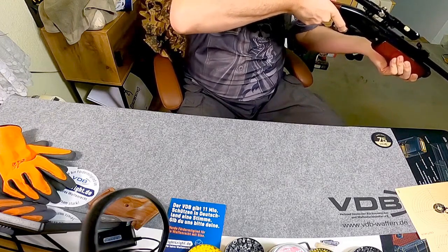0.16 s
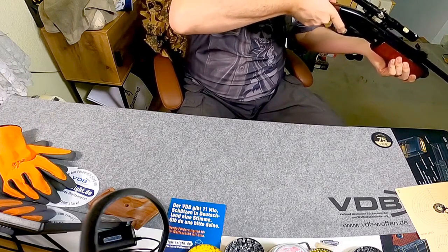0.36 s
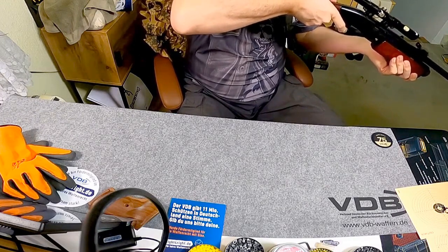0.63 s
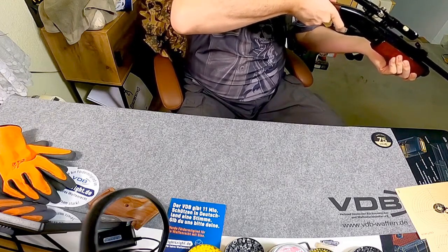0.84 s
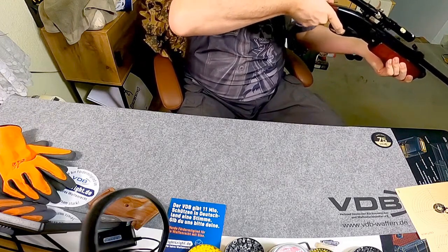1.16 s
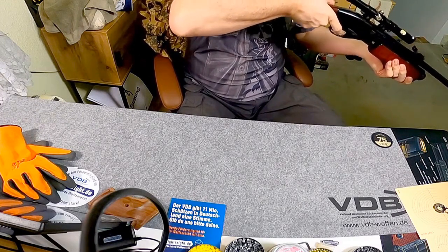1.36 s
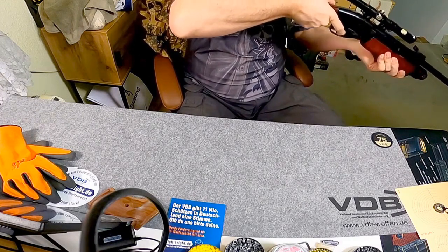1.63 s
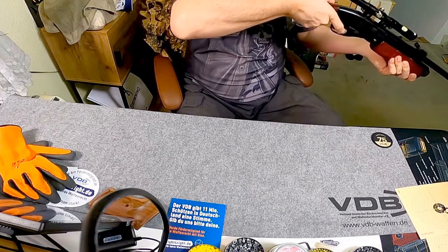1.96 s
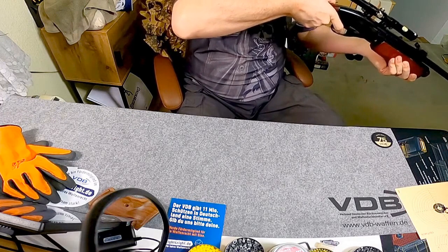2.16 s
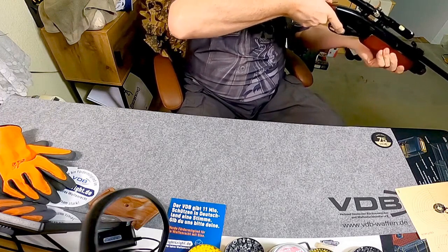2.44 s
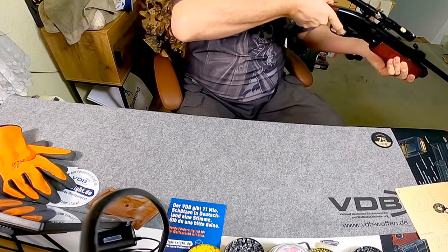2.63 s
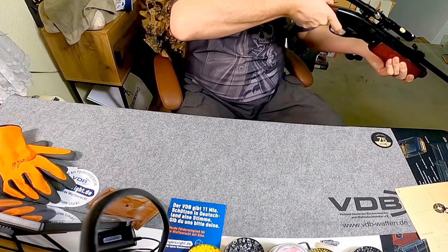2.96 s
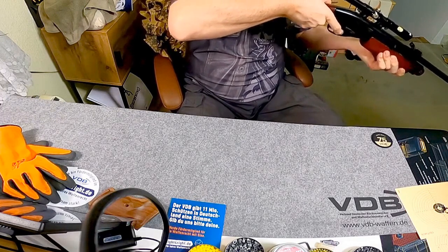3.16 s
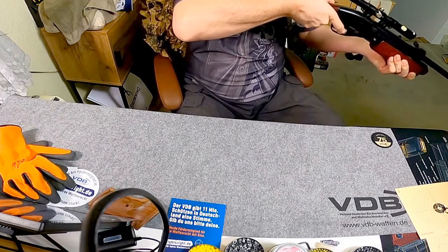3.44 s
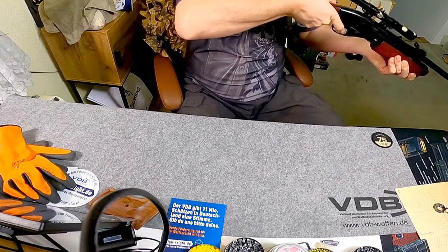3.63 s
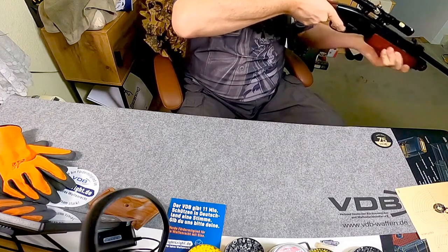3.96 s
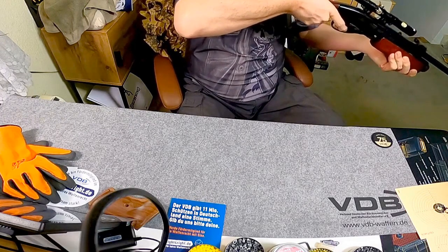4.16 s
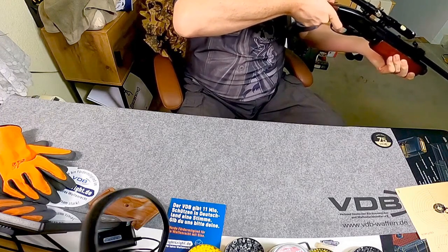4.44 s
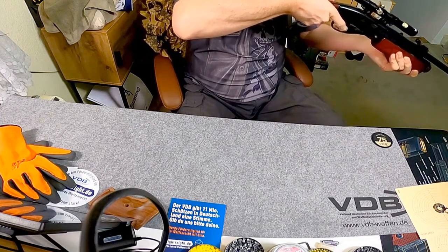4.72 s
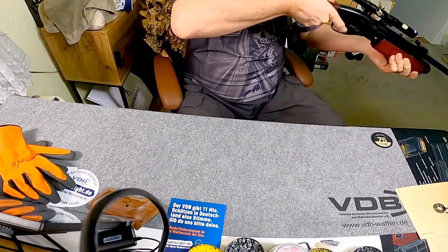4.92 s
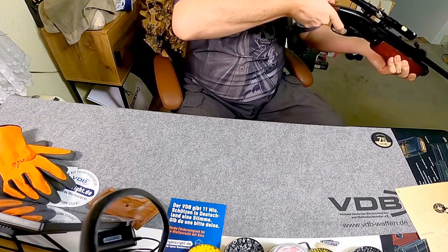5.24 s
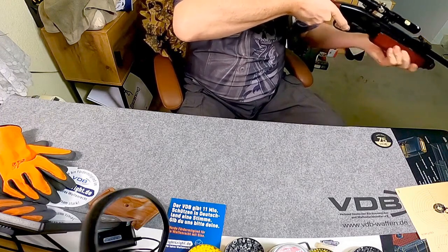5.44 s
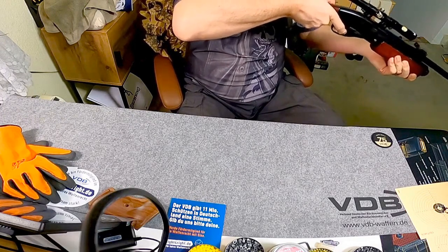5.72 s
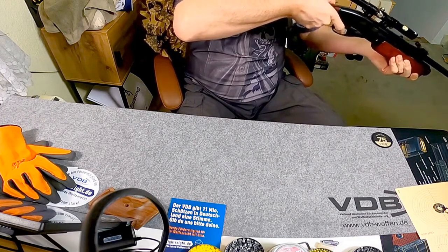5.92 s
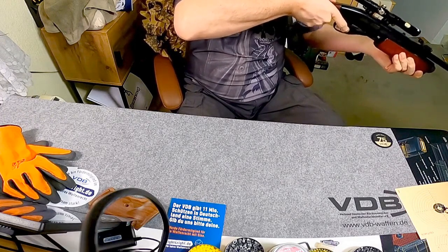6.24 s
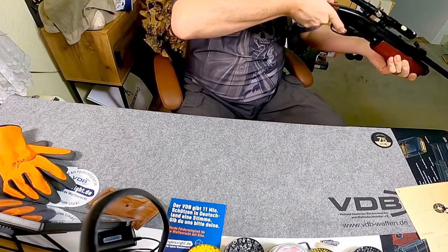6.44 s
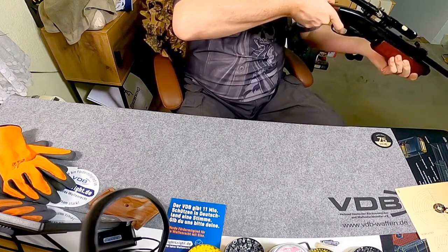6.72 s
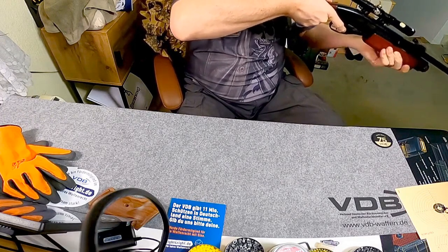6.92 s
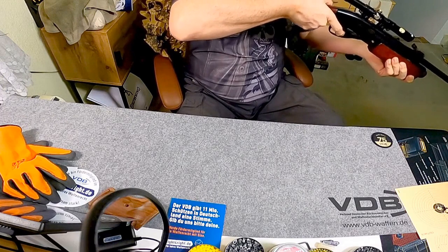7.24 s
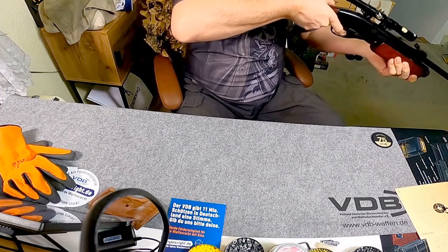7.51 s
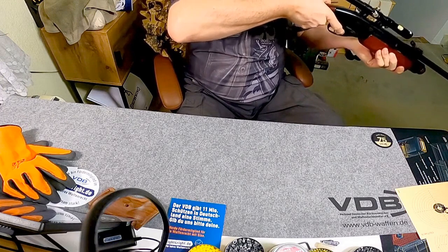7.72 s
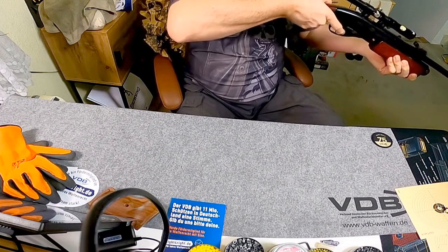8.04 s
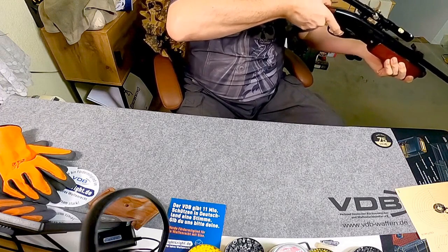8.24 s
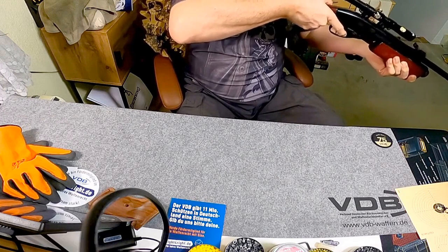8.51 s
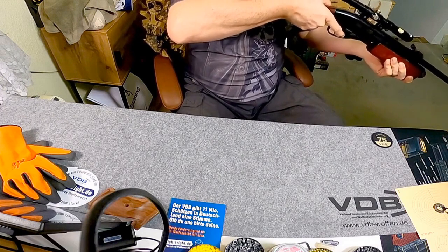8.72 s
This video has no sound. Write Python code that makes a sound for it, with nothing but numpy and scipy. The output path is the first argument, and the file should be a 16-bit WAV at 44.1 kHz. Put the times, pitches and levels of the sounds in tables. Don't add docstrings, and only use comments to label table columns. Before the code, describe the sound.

Close, sharp steel clacks repeat about every 0.7 seconds as a rifle's fore-end is pumped, each backward slam leaving a brief rattling spring jangle.

```python
import sys
import numpy as np
from scipy import signal
from scipy.fft import rfft, irfft, next_fast_len
from scipy.io import wavfile
from scipy.ndimage import uniform_filter1d, map_coordinates

SR = 44100
rng = np.random.default_rng(int(sys.argv[2]) if len(sys.argv) > 2 else 0)


def generate_wav(signal):
    frames = np.transpose(np.atleast_2d(signal))
    scaled = np.clip(frames, -1, 1) * 32767
    pcm = np.round(scaled).astype(np.int16)
    wavfile.write(sys.argv[1], SR, pcm)


def gain_from_db(level_db):
    decades = np.asarray(level_db, float) / 20
    return 10 ** decades


N = 391166

# t/s, crack level/dB, crack f/Hz, stroke scrape level/dB, stock level/dB
MEETS = [(.0007, -18, 4470, -24.5, -40), (1.1295, -19.5, 3990, -23.5, -50), (1.7176, -23.5, 3350, -24, -34),
         (2.4773, -19, 3160, -22.5, -33), (3.1985, -18.5, 3620, -25.5, -34), (3.99, -18, 2960, -22.5, -44),
         (4.7251, -22, 3600, -23, -45), (5.4268, -24, 4780, -22, -34), (6.1403, -23.5, 3000, -22, -29),
         (6.958, -20, 3150, -22.5, -29), (7.8053, -17, 3240, -21.5, -45)]


def meets():
    return [(s, db - 1.5, db, hz, stock_db, db - 16) for s, db, hz, _, stock_db in MEETS]


# t/s, crack level/dB, crack f/Hz, pawl ring level/dB
KNOCKS = [(.0178, -12.5, 3300, -21), (1.1464, -19, 4250, -17), (1.7392, -15, 3780, -20.5),
          (2.4927, -16, 4030, -12.5), (3.215, -15, 3785, -15), (4.0062, -18, 3040, -23.5),
          (4.7419, -15, 3240, -15.5), (5.4471, -15, 2780, -22.5), (6.1584, -18, 2970, -18),
          (6.9758, -16.5, 2590, -15.5), (7.8233, -13.5, 3004, -18)]
# t/s, crack level/dB, crack f/Hz, pawl ring level/dB
STRAYS = [
    (1.1517, -21.5, 3300, -21.5),
    (1.7263, -24.5, 3814, -23),
    (4.5395, -26.5, 3800, -21),
    (5.9755, -16.5, 3770, -20),
    (6.8101, -20.5, 3970, -11.5),
]


def knocks():
    return [(s, ring_db, db, hz, db - 8.5, db - 16) for s, db, hz, ring_db in KNOCKS + STRAYS]


def rebounds():
    return [(s + .034, db - 26, db - 22, 2700, db - 16, db - 34) for s, db, *_ in KNOCKS]


# t/s, crack level/dB, crack f/Hz, pawl ring level/dB
DROPS = [(.143, -29, 2680, -20.5), (1.2739, -26, 3190, -15.5), (1.853, -24.5, 3490, -15.5),
         (2.6076, -29, 3270, -24), (3.317, -27.5, 4720, -20), (4.1066, -31, 2530, -20.5),
         (4.8442, -28, 4200, -18), (5.5474, -39.5, 3670, -15.5), (6.26, -28, 2830, -16),
         (7.0772, -31.5, 2700, -23.5), (7.931, -32.5, 2700, -21)]


def drops():
    return [(s, ring_db, db, hz, db - 14, db - 18) for s, db, hz, ring_db in DROPS]


# t/s, pawl ring level/dB
TEETH = [(.159, -23), (.1638, -22), (1.288, -28), (1.3013, -37), (1.8668, -25), (2.614, -15), (2.629, -23),
         (3.3247, -16), (3.3396, -26), (4.1132, -21.5), (4.1233, -18), (4.137, -24.5), (4.8502, -19),
         (4.8565, -30), (5.5593, -20.5), (6.278, -26), (7.0872, -34), (7.094, -25), (7.9355, -18.5),
         (7.9477, -31), (7.952, -25), (7.9559, -33)]


def teeth():
    return [(s, db, db - 18, 3300, db - 17.2, db - 24) for s, db in TEETH]


# t/s, crack level/dB, crack f/Hz, fizz level/dB
LOCKS = [(.1918, -16, 4020, -24.5), (1.323, -17.5, 4330, -25.5), (1.8999, -17.5, 3790, -32.5),
         (2.6591, -18, 4500, -32), (3.3623, -22, 5110, -30), (4.1532, -23.5, 4420, -29),
         (4.8898, -20.5, 4330, -25), (5.5926, -19.5, 3660, -27), (6.3024, -18.5, 3630, -23.5),
         (7.1268, -20, 4665, -24.5), (7.978, -18.5, 4280, -25)]


def locks():
    return [(s, db - 1.5, db, hz, db - .8, fizz_db) for s, db, hz, fizz_db in LOCKS]


# t/s, crack level/dB, crack f/Hz, stroke scrape level/dB, fizz level/dB
SLAMS = [(.9147, -14.5, 4380, -20.5, -34), (1.5124, -14, 4340, -21.5, -29),
         (2.242, -15.5, 4640, -20.5, -38), (2.9709, -14, 4500, -19, -27), (3.7893, -16.5, 4280, -20.5, -35),
         (4.5454, -13, 4810, -19, -25), (5.2729, -12.5, 5000, -20.5, -21), (5.9607, -14, 4750, -23, -33.5),
         (6.7777, -12, 4980, -20, -28.5), (7.5911, -15.5, 4230, -18.5, -24),
         (8.4418, -14.5, 4830, -20.5, -30)]


def slams():
    return [(s, db - 15, db, hz, db - 14, fizz_db) for s, db, hz, _, fizz_db in SLAMS]


# t/s, blow level/dB, rattle level/dB, t60/s
RELEASES = [(.9369, -20, -22, .36), (1.5348, -25, -20.5, .3), (2.264, -23, -16, .3), (2.996, -23, -21, .34),
            (3.8132, -23, -21.5, .4), (4.5675, -31, -22, .44), (5.2942, -19, -19, .36),
            (5.9838, -19, -18.5, .34), (6.7958, -20, -21, .34), (7.6145, -25, -21, .35),
            (8.44, -60, -26, .42)]


def releases():
    return [(s, db - 7, db - 3, 4600, db - 6, db) for s, db, *_ in RELEASES]


def thud():
    pawl_db, crack_db, stock_db, fizz_db = -40, -40, -20, -50
    return [(8.454, pawl_db, crack_db, 2000, stock_db, fizz_db)]


# f/Hz, level/dB, t60/s
PAWL = [(1788, 5, 0.012), (1575, -5, 0.013), (2117, -5.5, 0.012), (2920, -9, 0.012), (6480, -23.5, 0.048)]


def pawl(db, t):
    return gain_from_db(db + 10.5) * ring(PAWL, t, detune=0.029) * (1 - np.exp(-t / 0.0011)) ** 2


# t/s, level/dB
TICKS = [(.8975, -26), (1.244, -34.5), (1.264, -26), (1.846, -24), (2.2184, -40), (2.9327, -34.5),
         (4.523, -29), (4.837, -20.5), (5.2474, -26.5), (5.542, -23), (5.9395, -29.5), (6.2545, -24),
         (6.75, -32), (7.567, -26), (8.418, -30)]


def ticks():
    out, t = np.zeros(N + SR), np.arange(SR // 8) / SR
    for s, db in TICKS:
        out[round(s * SR):][:len(t)] += pawl(db, t)
    return out[:N]


# ratio of f, level/dB
CLANK = [(1, 0), (.9, -3), (1.12, -3), (.72, -6), (1.35, -7)]


def clank(db, crack_hz, t):
    modes = [(ratio * crack_hz, mode_db, .016) for ratio, mode_db in CLANK]
    return gain_from_db(db + 7) * ring(modes, t, detune=.04) * (1 - np.exp(-t / 0.001))


# f/Hz, level/dB, t60/s
STOCK = [(671, 3.5, 0.034), (305.6, -8, 0.057), (1050, 3.5, 0.031), (165.8, -7, 0.05)]


def stock(db, t):
    return gain_from_db(db - 1) * ring(STOCK, t, detune=0.065) * (1 - np.exp(-t / 0.0014))


# f/Hz, width/Hz, level/dB
RECEIVER = [(2580, 90, 0), (2700, 150, 0.5), (2850, 200, -2), (3730, 130, -9.5), (1750, 150, -7),
            (650, 190, -5)]


def receiver(shaken):
    buzz = lines(RECEIVER, rng.standard_normal(N))
    return buzz * signal.fftconvolve(shaken, dying(0.2, rise=0.0017))[:N]


# f/Hz, level/dB
CRACK = [(1500, -36), (2400, 0.5), (4500, -2), (6500, -1.5), (8500, -28.5)]
# f/Hz, level/dB
FIZZ = [(5500, -29.5), (7200, 1), (11000, -2.5), (14000, -7.5), (15200, -17), (15800, -39.5)]


def contacts():
    out, shaken, t = np.zeros(N + SR), np.zeros(N + SR), np.arange(SR // 8) / SR
    crack, fizz = (np.pad(noise(colour), (0, SR)) for colour in (CRACK, FIZZ))
    snap = gain_from_db(-60 * t / 0.026) * (1 - np.exp(-t / .0009))
    lead = SR // 80
    since = t - lead / SR
    puff = gain_from_db(np.minimum(-60 * since / 0.056, 2300 * since + 1.2))
    blows = (meets() + knocks() + rebounds() + drops() + teeth() + locks()
             + slams() + releases() + thud())
    for s, pawl_db, crack_db, crack_hz, stock_db, fizz_db in blows:
        start = round(s * SR)
        at = slice(start, start + len(t))
        out[at] += gain_from_db(crack_db + 2) * snap * crack[at]
        out[at] += clank(crack_db, crack_hz, t)
        out[at] += pawl(pawl_db, t)
        out[at] += stock(stock_db, t)
        early_start = max(start - lead, 0)
        early = slice(early_start, early_start + len(t))
        out[early] += gain_from_db(fizz_db - 2.5) * puff * fizz[early]
        shaken[start] = gain_from_db(0.37 * pawl_db + 0.74 * crack_db - 17.5)
    return out[:N] + receiver(shaken)


def slides():
    def span(first, last, db, delay, bright_db, run_up, stop):
        return first + delay, db, bright_db, run_up, last - first + stop - delay

    back = [span(a[0], b[0], a[3], -.002, -6, .029, .02) for a, b in zip(SLAMS, RELEASES)]
    forward = [span(a[0], b[0], a[3], .004, -11, .025, .012) for a, b in zip(MEETS, KNOCKS)]
    creep = [span(a[0], b[0], -31, .001, -13, .026, .02) for a, b in zip(DROPS, LOCKS)]
    return back + forward + creep


# f/Hz, level/dB per Hz
SCRAPE = [(15, -59.5), (25, -31.5), (349, -2), (543, -0.5), (730, 0.5), (1030, -5), (1860, -1.5),
          (4410, -5.5), (4980, -10.5), (5500, -8), (5920, -6.5), (9000, -25), (11700, -47.5), (19800, -120)]


def strokes():
    dull, bright = np.zeros(N), np.zeros(N)
    for s, db, bright_db, run_up, hold in slides():
        near = slice(max(round(s * SR) - SR // 5, 0), min(round(s * SR) + SR // 3, N))
        t = np.arange(near.start, near.stop) / SR
        early = np.clip(s - t, 0, None) / run_up
        late = np.clip(t - s - hold, 0, None)
        shape_db = -24 * early - 20 * np.clip(early - 1, 0, None) - 60 * late / 0.13
        dull[near] += gain_from_db(db - 2.5 + shape_db)
        bright[near] += gain_from_db(db + bright_db - 3.5 + 0.93 * shape_db)
    drag = gain_from_db(-7.5) * lines([(1780, 330, 0)], noise(SCRAPE, grit_db=5))
    fizz = patchy(noise(FIZZ, grit_db=2), depth_db=4.5, size=(2, 6))
    return dull * (noise(SCRAPE, grit_db=2) + drag) + bright * fizz


# main f/Hz, level/dB, second f/Hz, level/dB
JANGLES = [
    (4993, -16, 5930, -19.5),
    (5020, -19, 6500, -22.5),
    (5050, -19.5, 8930, -22),
    (5030, -19, 5890, -20),
    (5040, -14.5, 5900, -28),
    (5080, -16.5, 8600, -25),
    (5050, -19.5, 5800, -23.5),
    (4879, -22.5, 5874, -22),
    (4920, -17.5, 8570, -23),
    (5010, -15.5, 8420, -19.5),
]
# f/Hz, level/dB
COIL = [(3510, -35), (4890, -28), (5900, -30), (6450, -27), (7250, -28), (8420, -29), (9950, -35),
        (12100, -40)]
# f/Hz, width/Hz, level/dB
BARREL = [(1900, 82, 0), (3080, 17, -1), (3510, 26, 0.5), (6060, 40, -2), (6470, 73, -1), (7000, 45, -3.5)]


def spring():
    barrel = lines(BARREL, noise([(100, 0), (15000, 0)], grit_db=5.5))
    rattle = patchy(noise(SCRAPE, grit_db=2.5), depth_db=3.5, size=(1, 6))
    rattle += gain_from_db(-8.5) * patchy(noise(FIZZ, grit_db=2.5), depth_db=4.5, size=(2, 8))
    out, hum, chatter = np.zeros((3, N + SR))
    t = np.arange(SR // 4) / SR
    for s, _, rattle_db, t60 in RELEASES:
        chatter[round(s * SR):][:SR // 2] += gain_from_db(rattle_db) * dying(0.86 * t60, rise=0.0043)
    for (s, *_), (main_hz, main_db, second_hz, second_db) in zip(RELEASES, JANGLES):
        start = round(s * SR)
        hum[start:][:SR // 2] += gain_from_db(-31) * dying(.35, rise=.004)
        seated = [(hz * (1 + .008 * rng.normal()), db + 3 * rng.normal()) for hz, db in COIL]
        for hz, db in [(main_hz, main_db), (second_hz, second_db)] + seated:
            t60 = 19 / np.sqrt(hz)
            split = [(hz, 0, t60), (hz + 60, -4, t60), (hz - 120, -5, t60)]
            stutter = gain_from_db(3.5 * map_coordinates(rng.standard_normal(50), [t * 170]))
            tone = ring(split, t, detune=.002) * (1 - np.exp(-300 * t))
            out[start:][:len(t)] += gain_from_db(db - 4) * stutter * tone
    return out[:N] + hum[:N] * barrel + chatter[:N] * rattle


def squeal():
    out, t = np.zeros(N + SR), np.arange(SR // 2) / SR
    sag_per_s, wander_depth = 3.6, .07
    for s, db, *_ in KNOCKS:
        wander, rough = (map_coordinates(rng.standard_normal(300), [t * rate]) for rate in (45, 400))
        hz = 3000 * np.exp(-sag_per_s * t + wander_depth * wander)
        tone = gain_from_db(5.5 * rough) * np.sin(2 * np.pi * np.cumsum(hz) / SR)
        level_db = np.mean([db, -16]) - 14.5
        out[round(s * SR):][:len(t)] += gain_from_db(level_db) * dying(.22, rise=.012) * tone
    return out[:N]


# f/Hz, t60/s
WALLS = [(150, .22), (1000, 0.25), (3000, 0.23), (8000, 0.19), (15000, 0.22)]


def room(x):
    out, size = np.zeros(N + SR), SR // 8
    for start in range(0, N, size):
        hz, t, z = signal.stft(rng.standard_normal(SR // 2), SR, nperseg=256)
        decay = gain_from_db(-60 * t / along(WALLS, hz)[:, None])
        tail = signal.istft(z * decay, SR, nperseg=256)[1]
        wet = signal.fftconvolve(x[start:start + size], tail / np.linalg.norm(tail))
        out[start + 200:][:len(wet)] += wet
    return out[:N]


# f/Hz, level/dB per Hz
HUSH = [(12, -46), (20, -4), (90, -14), (122, -13), (157, 1), (186, -7), (290, -7), (493, -7.5),
        (651, -10.5), (935, -12.5), (1980, -15.5), (2620, -16), (15600, -27.5)]


def hush():
    return gain_from_db(-60.4) * patchy(noise(HUSH), depth_db=1.6, size=(10, 20))


def unit(x):
    return x / np.sqrt(np.mean(x ** 2) + 1e-20)


def along(points, hz):
    f, v = np.transpose(points)
    return np.interp(np.log(hz + 1), np.log(f + 1), v)


def filtered(x, response):
    m = next_fast_len(len(x) + SR // 4)
    return irfft(rfft(x, m) * response(np.fft.rfftfreq(m, 1 / SR)), m)[:len(x)]


def noise(spectrum, grit_db=0):
    lumps = np.repeat(rng.standard_normal(N // 90 + 1), 90)[:N]
    white = rng.standard_normal(N) * gain_from_db(grit_db * uniform_filter1d(lumps, 60))
    return unit(filtered(white, lambda hz: gain_from_db(along(spectrum, hz))))


def dying(t60, rise):
    t = np.arange(SR // 2) / SR
    return gain_from_db(-60 * t / t60) * (1 - np.exp(-t / rise))


def ring(modes, t, detune):
    out = np.zeros(len(t))
    for hz, db, t60 in modes:
        strength, shift, phase = rng.standard_normal(3)
        level_db = db + 2.5 * strength * (db < -2)
        out += gain_from_db(level_db - 60 * t / t60) * np.sin(2 * np.pi * hz * (1 + detune * shift) * t + phase)
    return out


def lines(modes, shake):
    def sway(f):
        return sum((-1) ** k * gain_from_db(db) * 1j * f * np.sqrt(width) / (hz * hz - f * f + 1j * f * width)
                   for k, (hz, width, db) in enumerate(modes))

    return unit(filtered(shake, sway)) * np.linalg.norm([gain_from_db(db) for *_, db in modes])


def patchy(x, depth_db, size):
    z = signal.stft(x, nperseg=512)[2]
    field = uniform_filter1d(rng.standard_normal(z.shape), size[0], 0)
    field = uniform_filter1d(field, size[1], 1)
    return unit(signal.istft(z * gain_from_db(depth_db * unit(field)), nperseg=512)[1][:N])


def scene():
    rifle = contacts() + ticks() + strokes() + spring() + squeal()
    mono = rifle + gain_from_db(-12) * room(rifle) + hush()
    return np.array([mono, mono])


def low_pass(x):
    return signal.sosfilt(signal.butter(12, 15750, fs=SR, output="sos"), x)


def record(dry):
    top = .62
    squashed = dry[0] / (1 + (dry[0] / top) ** 4) ** (1 / 4)
    mix = np.tile(filtered(squashed, lambda hz: hz < 15780), (2, 1))
    return low_pass(mix)


dry = scene()
out = record(dry)
generate_wav(out)
```